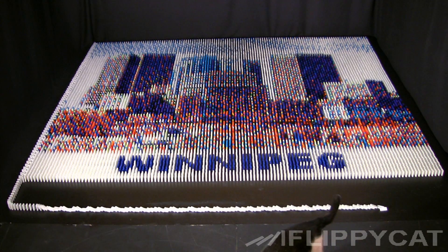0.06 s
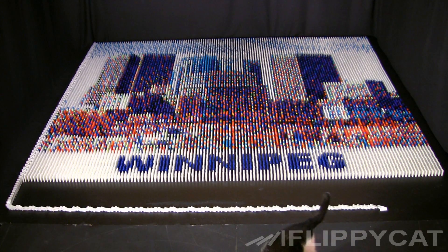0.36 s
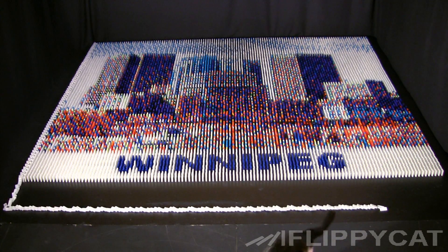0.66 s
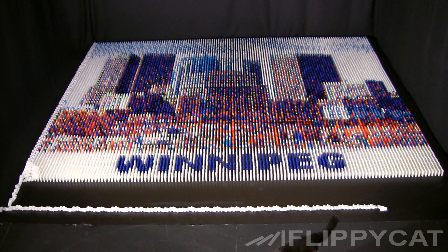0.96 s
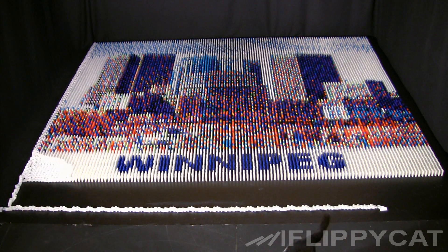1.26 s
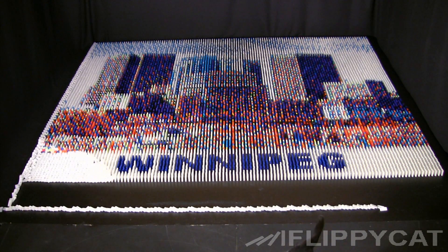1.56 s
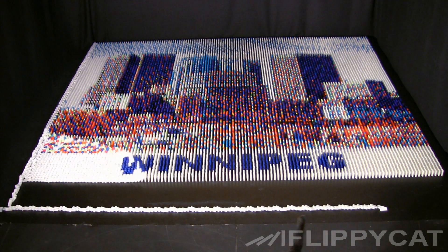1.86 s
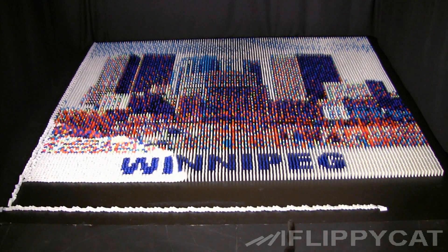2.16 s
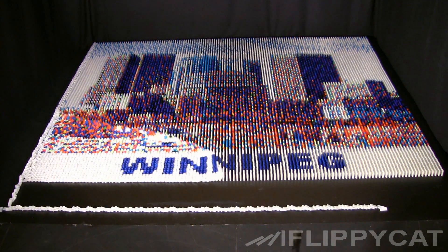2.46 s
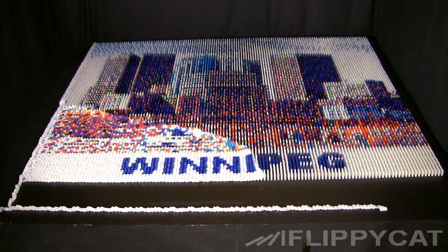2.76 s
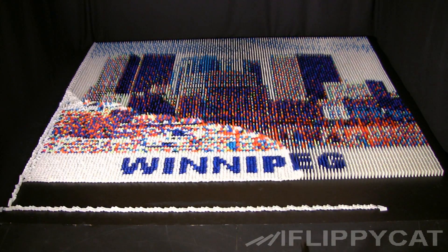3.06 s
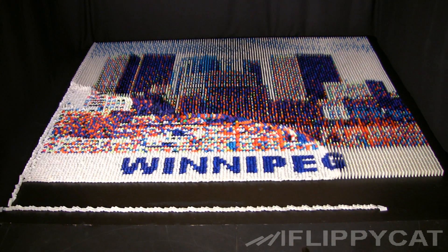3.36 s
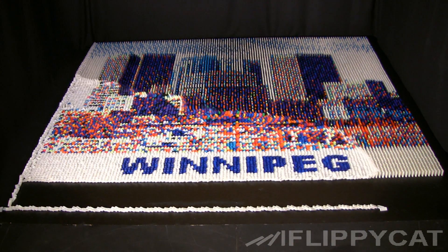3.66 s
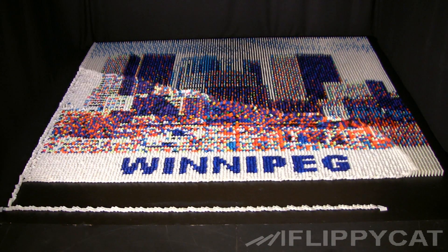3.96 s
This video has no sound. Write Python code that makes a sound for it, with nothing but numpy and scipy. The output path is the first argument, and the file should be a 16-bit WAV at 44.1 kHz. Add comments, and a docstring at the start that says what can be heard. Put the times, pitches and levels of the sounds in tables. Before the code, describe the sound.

Small plastic dominoes topple, a thin rattle swelling into a dense, steady clatter indoors.

```python
"""Indoors, on a board, plastic dominoes topple. A single line rattles round a corner,
then sets off a wide field whose front swells to a steady clatter.
Each impact gives a contact tick, the damped ring of a tile's modes and a knock on the board.
The board booms as the front spreads, and the room's reverberation blurs the collisions."""
import sys
import numpy as np
from scipy import signal
from scipy.fft import rfft, irfft
from scipy.io import wavfile
from scipy.ndimage import uniform_filter1d

SR = 44100
rng = np.random.default_rng(int(sys.argv[2]) if len(sys.argv) > 2 else 0)


def pcm_store(signal):
    """Save signal as 16-bit PCM."""
    levels = np.round(np.clip(np.atleast_2d(signal), -1, 1) * 32767)
    wavfile.write(sys.argv[1], SR, levels.astype(np.int16).T)


N = 176400

# Envelopes of the single line: t/s, ring level/dB, tick and knock level/dB (all levels are relative)
LINE_LEVELS = [(0, -26, -35), (.11, -26.5, -36.5), (.15, -29, -37.5), (.225, -34.5, -35.5),
               (.27, -29, -33.5), (.35, -29, -36.5), (.42, -32.5, -40), (.48, -31, -39),
               (.585, -26.5, -34.5), (.645, -28.5, -37.5), (.68, -24.5, -31), (.72, -24, -36),
               (.755, -34, -38.5), (.795, -29, -36.5), (.83, -35.5, -41), (.90, -32, -36),
               (.94, -39, -40.5), (1.1, -30.5, -43)]
# Envelopes of the field: t/s, ring level/dB, tick level/dB, knock level/dB
FIELD_LEVELS = [(.94, -38, -52, -43), (1.04, -33.5, -32.5, -36), (1.13, -24, -28, -36),
                (1.23, -21, -25, -30.5), (1.35, -20, -24, -30), (1.7, -20.5, -25, -32.5),
                (1.9, -19.5, -25.5, -31), (2.3, -21, -25, -32), (2.8, -20, -24, -31),
                (3.45, -20, -25, -31.5), (4, -20.5, -26, -32.5)]
# Modes of a white tile: f/Hz, level/dB, T60/s, fractional spread of f at unit variety
WHITE_MODES = [(4620, 3.5, 0.017, 0.0416), (7686, -8, 0.024, 0.021), (8120, -7.5, .018, 0.019),
               (10120, -7.5, 0.021, 0.0082), (10660, -5, .018, 0.027)]
# Spectra of the contact tick and of the knock on the board: f/Hz, level/dB
TICK_SPECTRUM = [(100, -82), (250, -30), (500, -31.5), (1500, -5.5), (2500, 0.5), (4000, 1.5), (5500, 0.5),
                 (6400, -2), (7300, 2.5), (8600, 0), (9400, 1), (11000, -13.5), (12000, -8), (13200, -28),
                 (14600, -20), (15600, -33)]
KNOCK_SPECTRUM = [(30, -49), (110, -47), (150, -28), (200, -23), (260, -10), (350, -6.5), (460, -0.5),
                  (600, 0.5), (750, 1.5), (830, -2), (930, 0.5), (1400, 2), (2200, 0), (4000, -7.5),
                  (12000, -28)]


def amp(db):
    """Amplitude ratio of a level in decibels."""
    return 10 ** (np.asarray(db) / 20)


def read(points, hz):
    """Interpolation on a logarithmic frequency axis."""
    f, value = np.transpose(points)
    return np.interp(np.log(hz + 1), np.log(f), value)


def envelope(table, column=1):
    """Amplitude envelope, interpolated in decibels."""
    rows = np.array(table)
    return amp(np.interp(np.arange(N) / SR, rows[:, 0], rows[:, column]))


def add(mix, start, sound):
    """Superposition of a delayed sound on the mix."""
    part = mix[:, max(int(start * SR), 0):][:, :sound.shape[-1]]
    part += sound[..., :part.shape[1]]


def colour(x, spectrum, size=2048):
    """Spectral shaping by a minimum-phase filter of unit energy."""
    log_gain = np.log(amp(read(spectrum, abs(np.fft.fftfreq(size, 1 / SR)))))
    pulse = np.fft.ifft(np.exp(np.conj(signal.hilbert(log_gain)))).real
    return signal.oaconvolve(x, pulse[None] / np.linalg.norm(pulse), axes=1)[:, :N]


def cascade(start, end, per_s, spread_db=2.5):
    """A random impact process of unit power: jittered times, log-normal strengths."""
    count = int((end - start) * per_s)
    jitter, strength = rng.random(N)[:count], rng.standard_normal(N)[:count]
    times = start + (np.arange(count) + 4 * jitter - 2) / per_s
    sizes = amp(spread_db * np.minimum(strength, 2.4))
    return times, sizes * np.sqrt(SR / per_s / np.mean(sizes ** 2))


def strike(times, sizes, sounds):
    """Incoherent summation: impacts of random polarity and position add up as mid and side."""
    out = np.zeros((2, N))
    place, polarity = rng.uniform(-1, 1, (len(times), 2)).T
    gains = sizes * np.sign(polarity) * np.array([np.ones(len(times)), np.sqrt(3) * place])
    for start, gain, sound in zip(times, gains.T, sounds):
        add(out, start, gain[:, None] * sound)
    return out


def room(x, size=14000, spots=8):
    """Reverberation: sparse reflections, dying first in the treble, differ for each spot on the board."""
    decay_times = [(200, 0.2), (1000, 0.35), (5000, 0.19), (14000, 0.16)]  # reverberation time: f/Hz, T60/s
    out = np.zeros((2, N))
    active_spot = rng.integers(0, spots, N // 256 + 1).repeat(256)[:N]
    for spot in range(spots):
        taps = rng.standard_normal((2, size)) * (rng.random((2, size)) < .1)
        taps *= np.arange(size) > .003 * SR  # initial time gap
        hz, t, spectra = signal.stft(taps, SR, nperseg=256)
        tail = signal.istft(spectra * amp(-60 * t / read(decay_times, hz)[:, None]), SR)[1]
        tail /= np.linalg.norm(tail, axis=1, keepdims=True)
        crossfade = np.sin(np.pi / 2 * uniform_filter1d((active_spot == spot) * 1., size=256))
        out += signal.oaconvolve(x * crossfade, tail, axes=1)[:, :N]
    return signal.sosfilt(signal.butter(4, 240, "high", fs=SR, output="sos"), out)


def board_booms(sag=.105):
    """Resonance: landing tiles excite the board in brief noise bands that sink slightly in pitch."""
    resonances = [(1.009, 1203, 690, -37, .24), (1.182, 473, 25.2, -40.5, 0.077),
                  (1.25, 219.5, 39.7, -56, 0.266)]  # board resonances: t/s, f/Hz, bandwidth/Hz, level/dB, duration/s
    out = np.zeros((2, N))
    for start, hz, width, db, length in resonances:
        t = np.arange(0, length, 1 / SR)
        noise = rng.standard_normal(N) + 1j * rng.standard_normal(N)
        stir = signal.sosfilt(signal.butter(6, width / 2, fs=SR, output="sos"), noise)[-len(t):]
        carrier = np.exp(2j * np.pi * np.cumsum(hz * (1 - sag * t / length)) / SR)
        boom = np.sin(np.pi * (t / length) ** .6) * (stir * carrier).real
        add(out, start, amp(db) * boom / boom.std())
    return out


def edge_snaps():
    """Impulsive contact: now and then two edges meet squarely in a broadband click."""
    times, sizes = cascade(FIELD_LEVELS[0][0], N / SR, per_s=20)
    impulses = strike(times, sizes, np.ones(len(times))) * envelope(FIELD_LEVELS, column=2)
    return amp(-18) * colour(impulses, TICK_SPECTRUM)


def scuffs(times, sizes, t60=.011, size=500):
    """Friction: each contact scrapes the plastic in an exponentially decaying burst of noise."""
    fade = amp(-60 * np.arange(size) / SR / t60)
    return strike(times, sizes, rng.standard_normal((len(times), size)) * fade / np.linalg.norm(fade))


def tile_rings(modes, pitches, variety, size=1300):
    """Free vibration: each tile rings in damped modes whose strengths depend on where it is struck."""
    rise_s, radiating_hz = .00022, (2700, 11940)  # a small tile radiates only in this band
    upper_follow = .57  # upper modes take on only part of a tile's pitch offset
    t, rings = np.arange(size) / SR, np.zeros((len(pitches), size))
    for k, (hz, db, t60, spread) in enumerate(modes):
        detune, coupling, polarity = rng.standard_normal((3, len(pitches), 1))
        detune = np.clip((detune - detune.mean()) / detune.std(), -2.2, 2.2)
        ratio = (pitches[:, None] / modes[0][0]) ** (upper_follow if k else 1)
        tuned_hz = hz * ratio * (1 + variety * spread * detune)
        strength = np.sign(polarity) * amp(db + 1.8 * coupling)
        rings += strength * amp(-60 * t / t60) * np.sin(2 * np.pi * tuned_hz * t)
    radiation = signal.butter(4, radiating_hz, "band", fs=SR, output="sos")
    rings = signal.sosfilt(radiation, rings * (1 - np.exp(-t / rise_s)))
    return rings / np.linalg.norm(rings, axis=1, keepdims=True)


def line_rings(times, sizes, step_s=.011, neighbours=3):
    """Natural frequency: each white tile keeps its pitch while it chatters against its neighbours."""
    lowest_mode = [(0, 4725), (.04, 4660), (.08, 4670), (.12, 4620), (.165, 4600), (.25, 4500), (.30, 4590),
                   (.345, 4860), (.42, 4670), (.53, 4650), (.60, 4630), (.72, 4754), (.86, 4680),
                   (.905, 4500), (.96, 4400), (1.1, 4540)]  # pitch of the tiles now falling: t/s, f/Hz
    falls = np.arange(int(LINE_LEVELS[-1][0] / step_s) + neighbours) * step_s
    bank = tile_rings(WHITE_MODES, np.interp(falls, *np.transpose(lowest_mode)), variety=.44)
    which = (times / step_s + neighbours * (rng.random(len(times)) - .5)).astype(int)
    return strike(times, sizes, bank[np.clip(which, 0, len(bank) - 1)])


def single_line(knock_db=-4, treble_hz=5250):
    """A chain of impacts: momentum passes from tile to tile in a rattle that dulls after the corner."""
    treble_levels = [(0, -2), (.72, -3.5), (.80, -8), (.93, -14), (1.1, -4.5)]  # varying part of the treble's gain: t/s, level/dB
    times, sizes = cascade(0, LINE_LEVELS[-1][0], per_s=900, spread_db=3)
    hits = scuffs(times, sizes) * envelope(LINE_LEVELS, column=2)
    rings = line_rings(times, sizes) * envelope(LINE_LEVELS)
    sound = rings + colour(hits, TICK_SPECTRUM) + amp(knock_db) * colour(hits, KNOCK_SPECTRUM)
    treble = signal.sosfiltfilt(signal.butter(6, treble_hz, "high", fs=SR, output="sos"), sound)
    return sound + treble * (envelope(treble_levels) - .5)


def hard_clacks(ring_db=10.5, contact_db=-8.5, rebound_s=.003, rebound_db=-3):
    """Inelastic rebound: a hard-hit tile in the line clinks and bounces, weaker at each contact."""
    impacts = [(0.0034, -8.5, 4720), (0.0184, -23, 4710), (0.0478, -20, 4700), (0.0544, -19, 4570),
               (0.0734, -22, 4560), (0.1059, -18, 4800), (0.1318, -13, 4340), (0.161, -12, 4550),
               (0.194, -11, 4400), (0.1999, -12, 4430), (0.2389, -11, 4520), (0.2937, -16, 4380),
               (0.3214, -16, 4850), (0.3494, -20, 5050), (0.3654, -17, 4340), (0.5347, -24, 4650),
               (0.5404, -30, 4560), (0.5594, -27, 4370), (0.5724, -13, 4450), (0.5845, -16, 4820),
               (0.6225, -13, 4800), (0.674, -11, 4480), (0.6804, -18, 4530), (0.6958, -24, 4650),
               (0.6984, -22, 4650), (0.7109, -19, 4740), (0.7222, -20, 4630), (0.7916, -16, 4760),
               (0.852, -21, 4640), (0.9002, -15, 4460), (0.9154, -33, 4220)]  # hard impacts: t/s, level/dB, lowest mode f/Hz
    starts, db, pitches = np.transpose(impacts)
    rings = strike(starts, amp(db), tile_rings(WHITE_MODES, pitches, variety=0))
    bounce = np.arange(3)
    times = starts[:, None] + rebound_s * bounce
    sizes = amp(db[:, None] + rebound_db * bounce)
    hits = scuffs(times.ravel(), sizes.ravel())
    contacts = colour(hits, TICK_SPECTRUM) + colour(hits, KNOCK_SPECTRUM)
    return amp(ring_db) * rings + amp(contact_db) * contacts


def field_rings(times, sizes, count=300):
    """Modal overlap: detuned rings merge, coloured tiles joining white ones as the front advances."""
    # Modes of a coloured tile: f/Hz, level/dB, T60/s, fractional spread of f at unit variety
    coloured_modes = [(4963, -0.5, .028, 0.0475), (7410, -6, 0.019, 0.024), (8040, -3, 0.014, .04),
                      (10130, -5, 0.014, 0.021), (10740, -3.5, 0.013, 0.04)]
    banks = [tile_rings(modes, np.full(count, modes[0][0]), variety=.92)
             for modes in (WHITE_MODES, coloured_modes)]
    coloured_share = np.interp(times, (1.3, 2.7), (0, .8))
    kind, which = rng.random((len(times), 2)).T
    rings = [banks[int(coloured)][int(pick * count)]
             for coloured, pick in zip(kind < coloured_share, which)]
    return strike(times, sizes, rings)


def wide_field(per_s=3200, scuff_t60=.0056):
    """Dense impacts fuse into a clatter: many rows of tiles strike each other and land on the board."""
    span = FIELD_LEVELS[0][0], N / SR
    collisions = cascade(*span, per_s)
    ticks = scuffs(*collisions, scuff_t60) * envelope(FIELD_LEVELS, column=2)
    landings = scuffs(*cascade(*span, per_s), scuff_t60) * envelope(FIELD_LEVELS, column=3)
    rings = field_rings(*collisions) * envelope(FIELD_LEVELS)
    return rings + colour(ticks, TICK_SPECTRUM) + colour(landings, KNOCK_SPECTRUM)


def scene(room_db=-3, gain_db=-1.61, left_db=.15):
    """Direct and reverberant sound superpose in a stereo image that is widest in the treble."""
    stereo_width = [(60, -6), (200, -12), (1300, -17), (3000, -13), (4800, -8.5), (7500, -6), (10000, -1),
                    (12000, -3.5), (15000, -5)]  # gain of side relative to mid: f/Hz, level/dB
    direct = single_line() + hard_clacks() + wide_field() + edge_snaps() + board_booms()
    mid, side = amp(gain_db) * (direct + amp(room_db) * room(direct))
    side_gain = amp(read(stereo_width, np.fft.rfftfreq(2 * N, 1 / SR)))
    side = irfft(rfft(side, 2 * N) * side_gain)[:N]
    return np.array([(mid + side) * amp(left_db), (mid - side) * amp(-left_db)])


def record(dry):
    """Band limiting: a gentle bass cut and a steep treble edge."""
    low_cut_hz, edge_hz = 160, 15750
    dry = signal.sosfilt(signal.butter(1, low_cut_hz, "high", fs=SR, output="sos"), dry)
    low_pass = signal.firwin(511, edge_hz, window=("kaiser", 9), fs=SR)
    return signal.oaconvolve(dry, low_pass[None], "same")


dry = scene()
out = record(dry)
pcm_store(out)
```